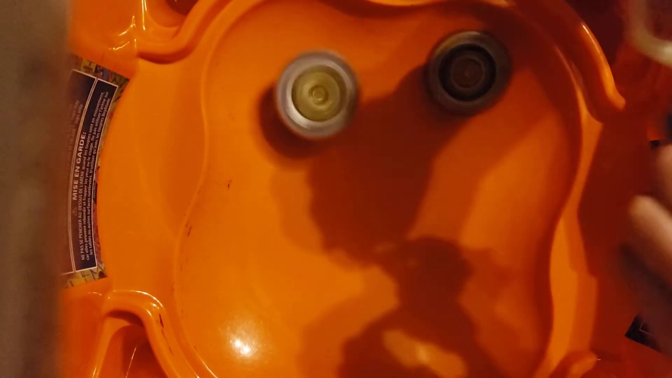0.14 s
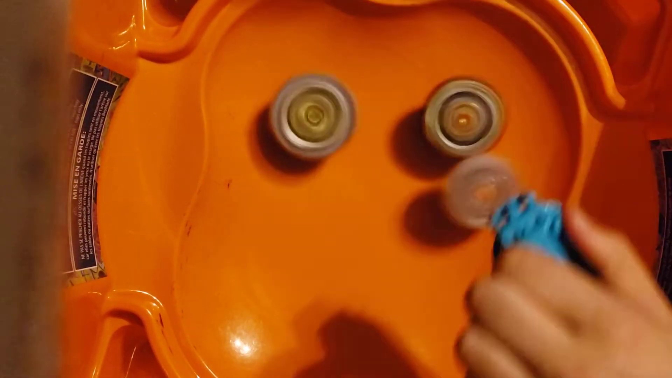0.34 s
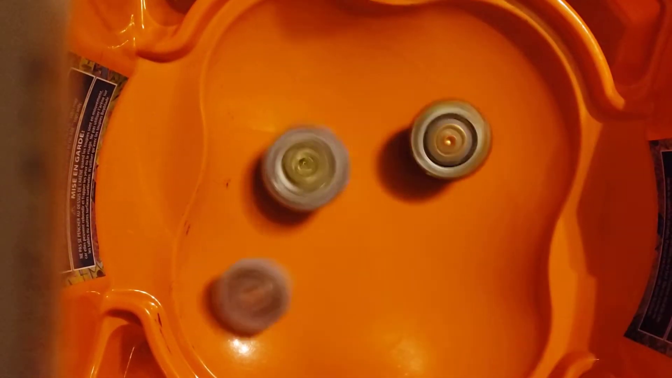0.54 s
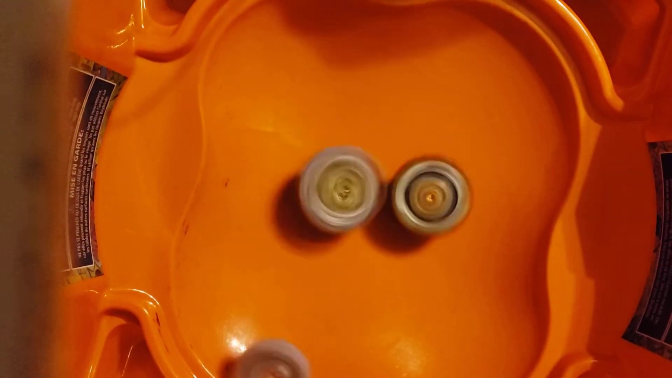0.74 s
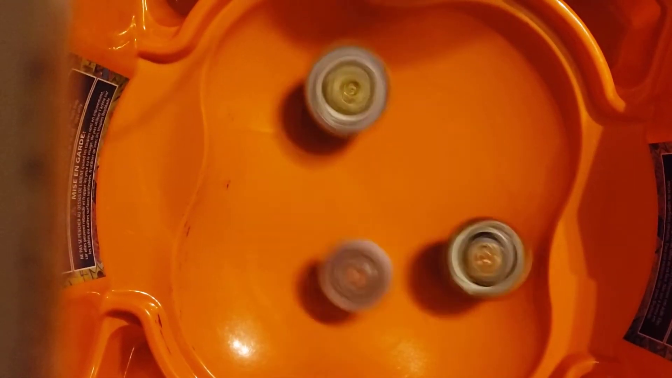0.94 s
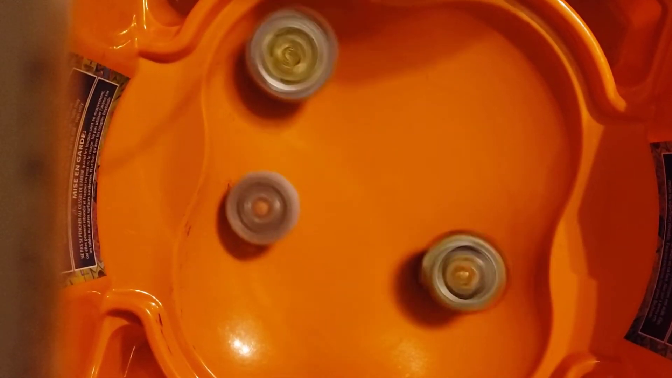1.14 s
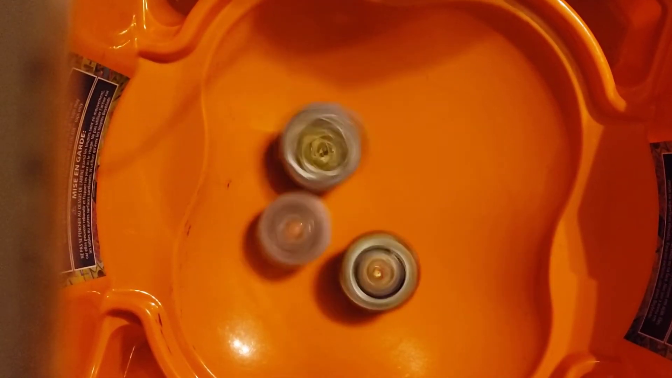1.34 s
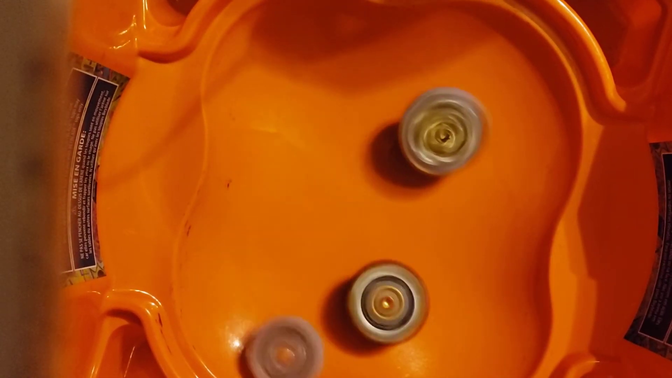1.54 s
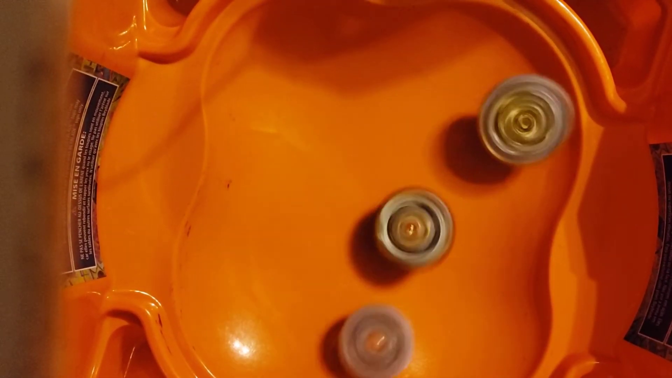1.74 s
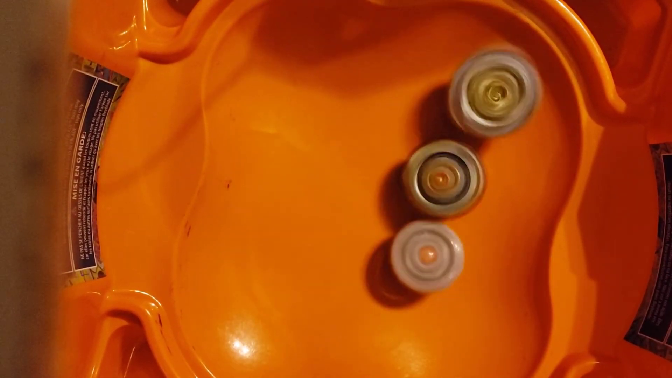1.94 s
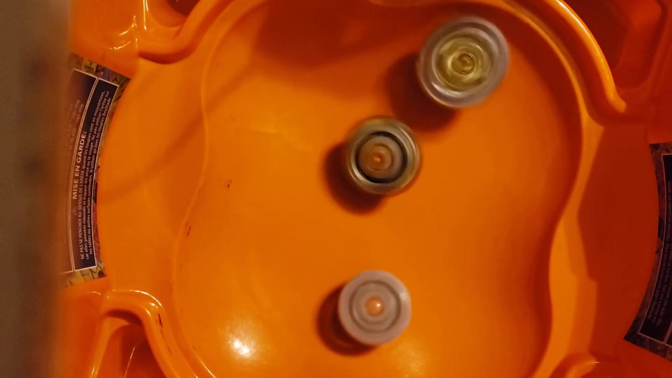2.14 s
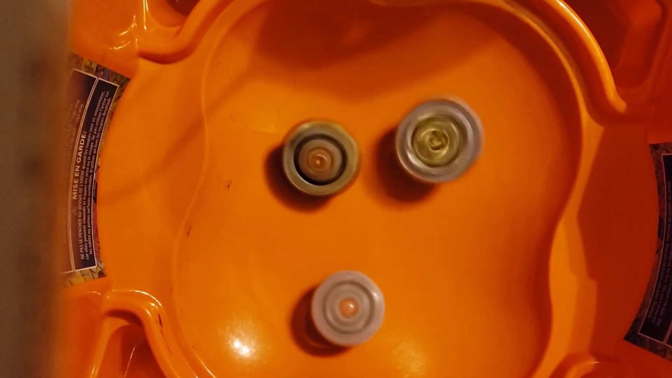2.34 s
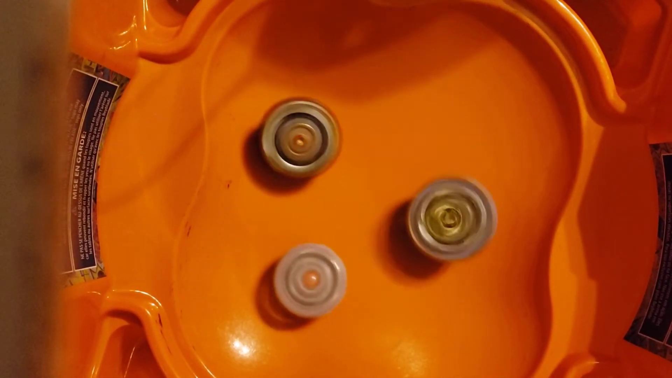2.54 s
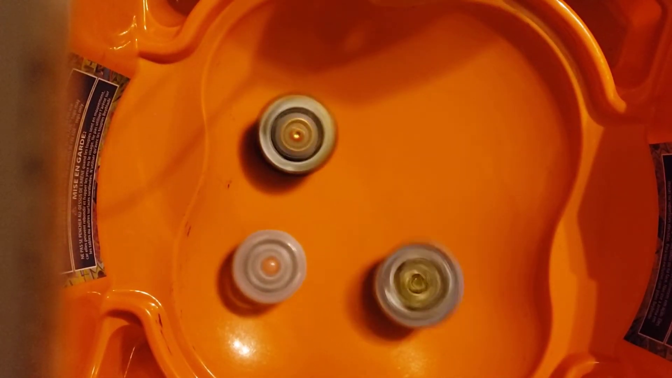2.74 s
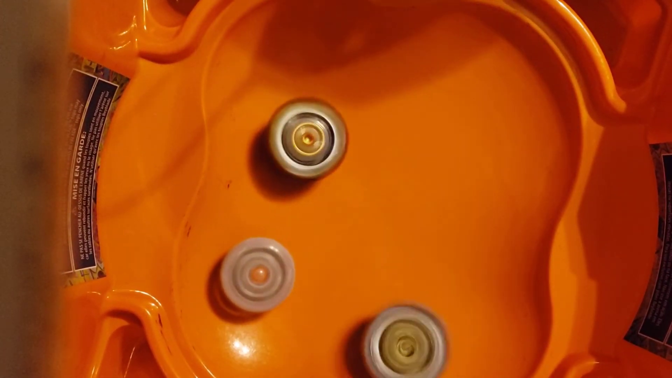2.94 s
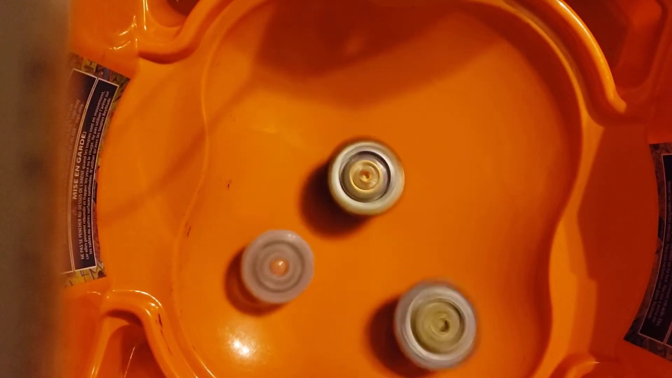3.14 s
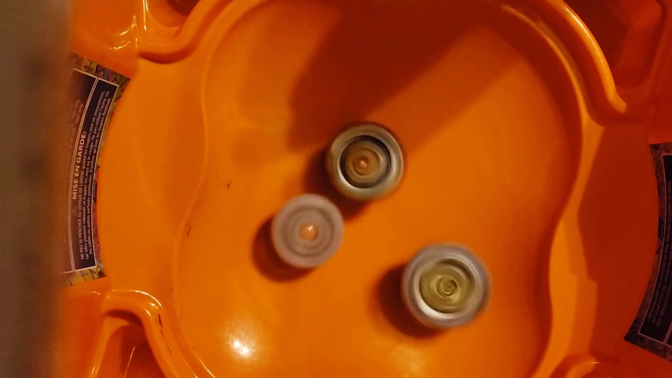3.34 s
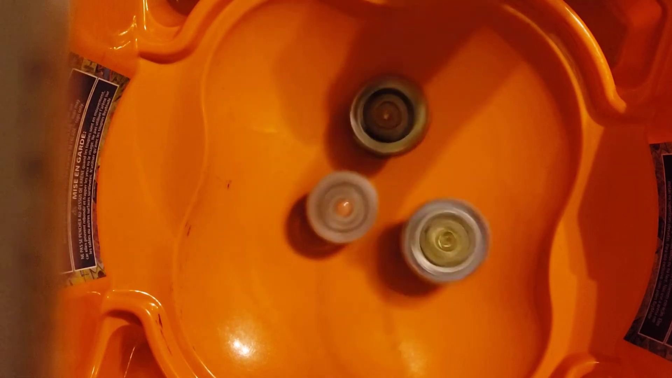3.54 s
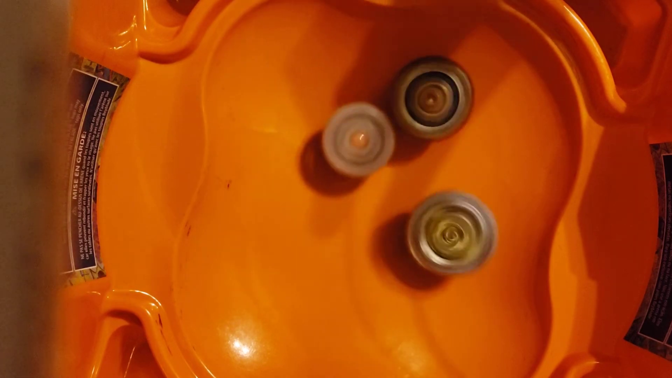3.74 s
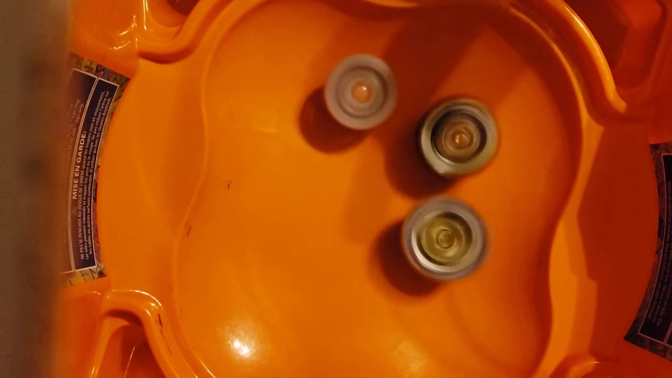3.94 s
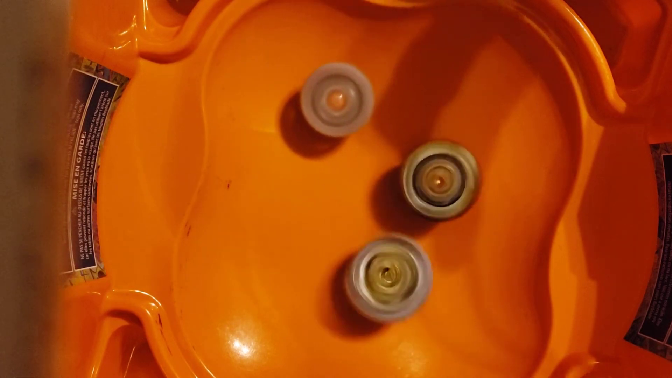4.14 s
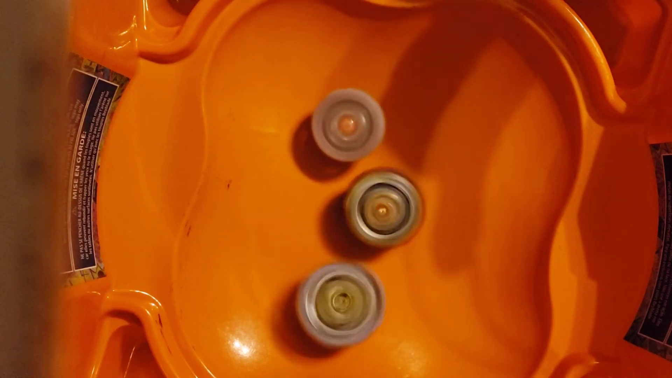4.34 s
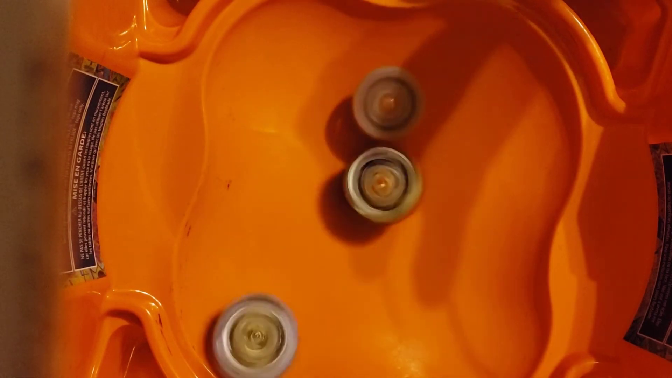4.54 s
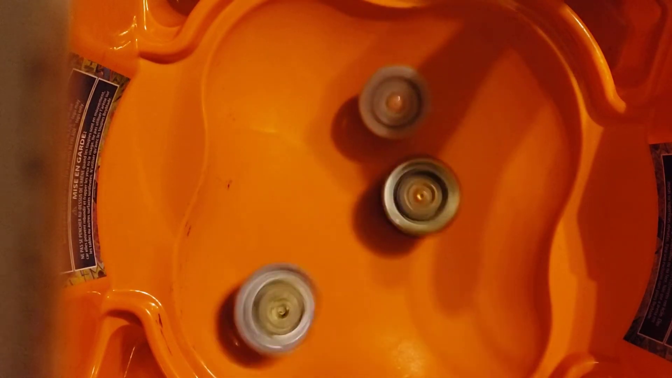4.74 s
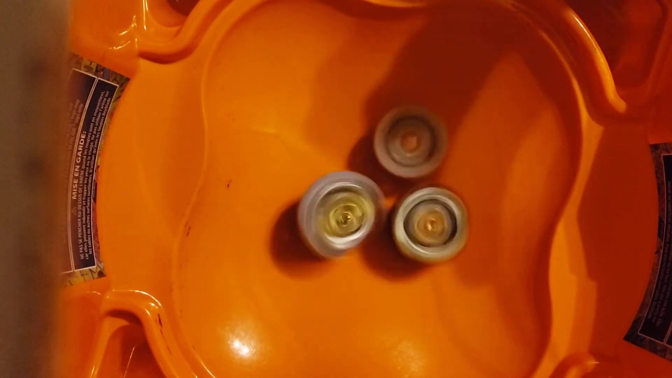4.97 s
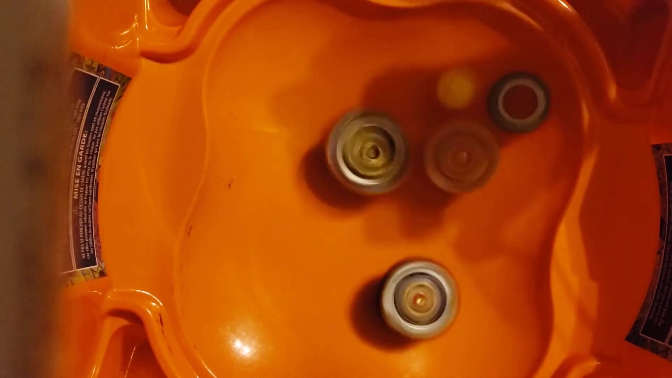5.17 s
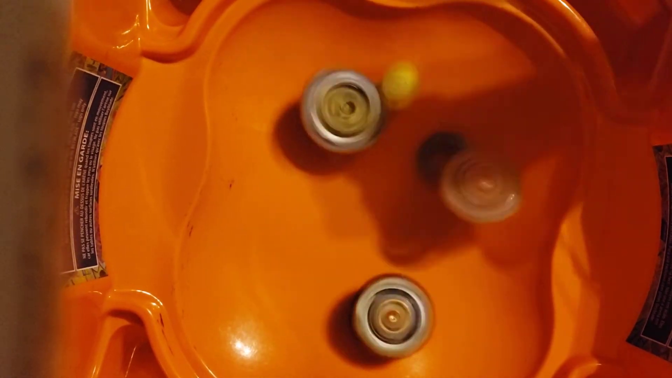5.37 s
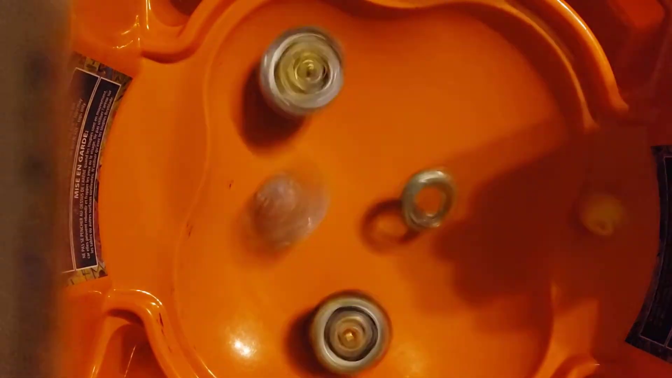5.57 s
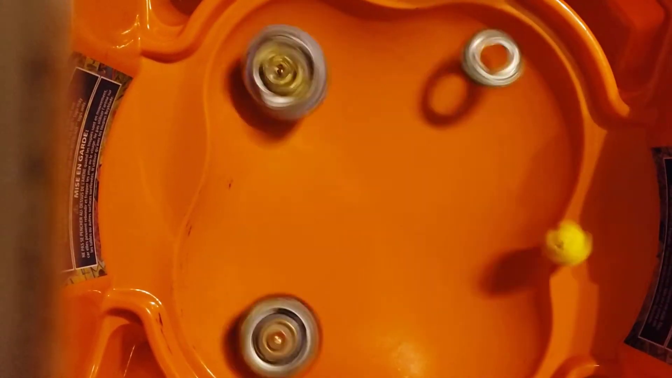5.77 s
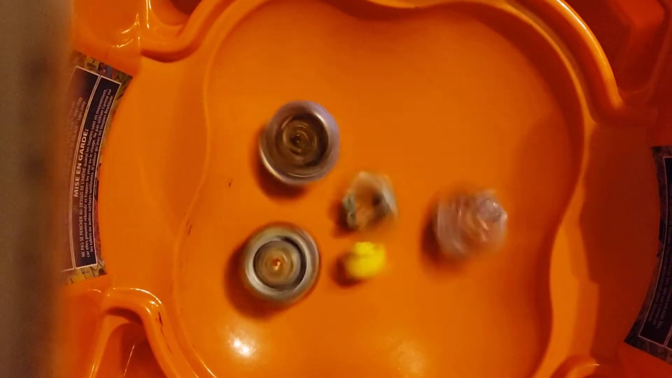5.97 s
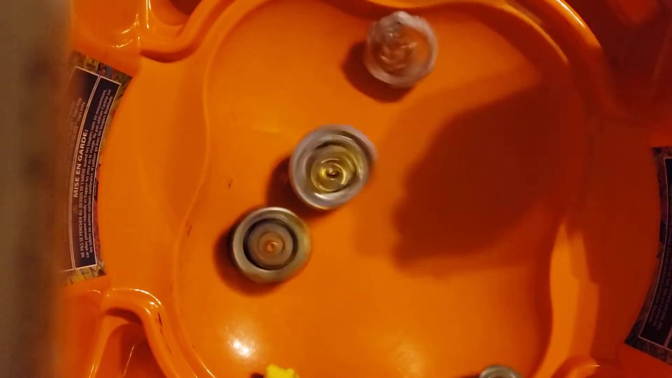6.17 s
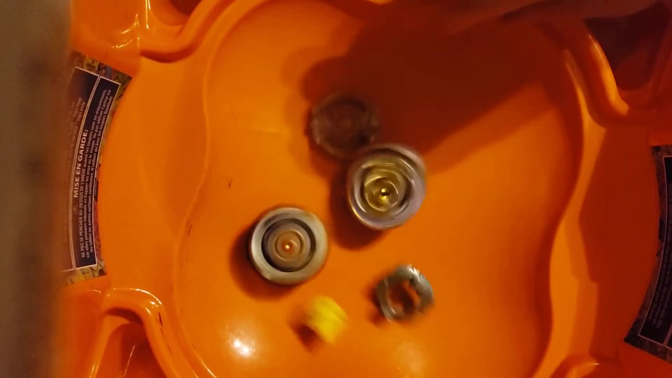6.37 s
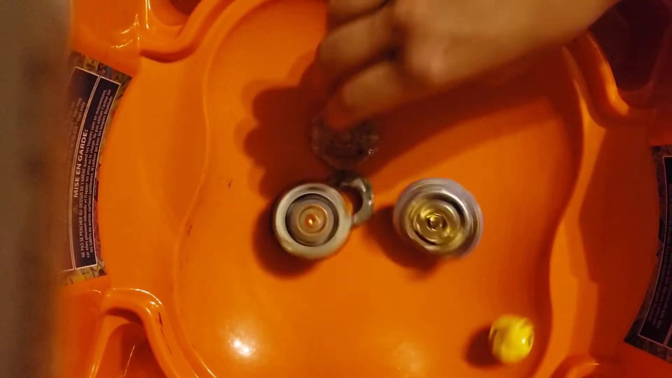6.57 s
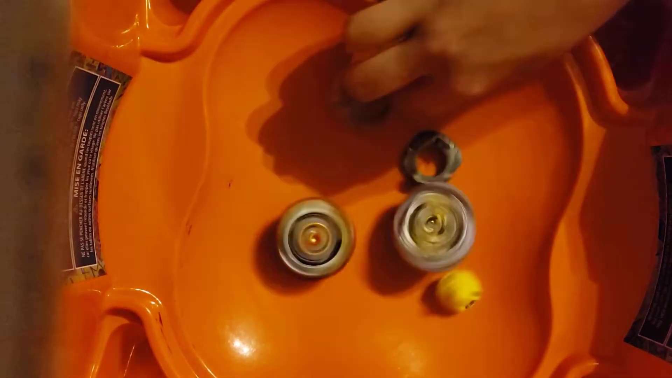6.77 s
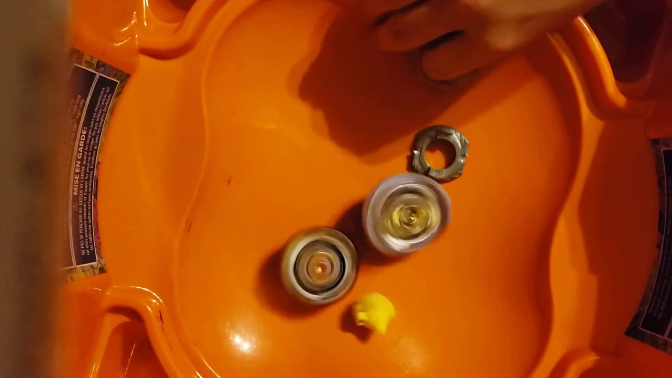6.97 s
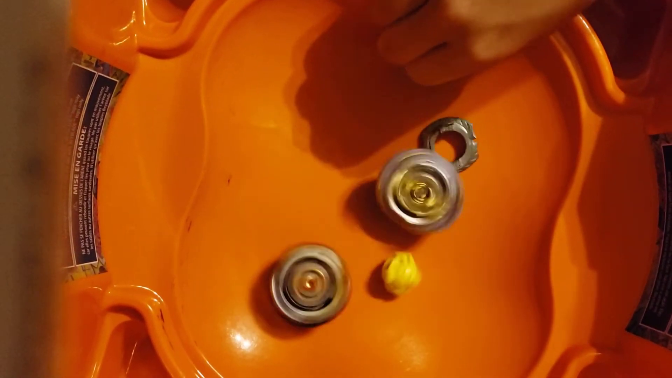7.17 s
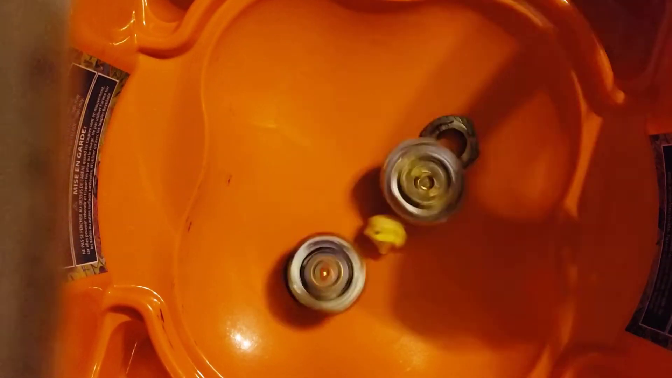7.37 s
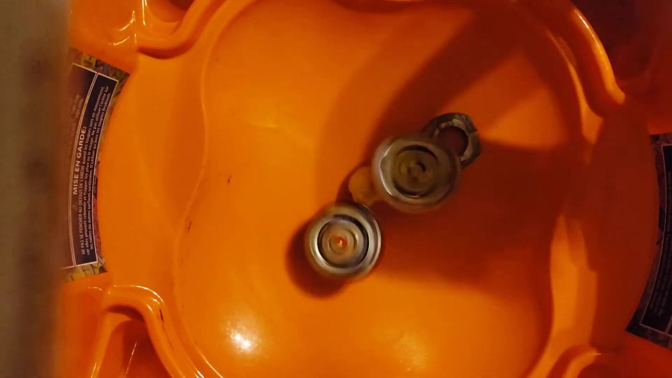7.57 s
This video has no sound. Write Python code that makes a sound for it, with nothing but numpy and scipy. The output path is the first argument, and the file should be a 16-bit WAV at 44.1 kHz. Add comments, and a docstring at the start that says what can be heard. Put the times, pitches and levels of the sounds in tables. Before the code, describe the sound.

Very close in a small room, tops spin on a thin hollow plastic shell with a low throbbing rumble, buzz and fast ticking. Faint taps open; at about 0.24 s a cord's teeth zip in a tenth-second rising rasp with a sharp crack. From 0.4 to 1.1 s bright rim clacks mix with dull shell thumps. More clicks come at 1.4, then a thump near 1.7 and a cluster around 2.0. Mostly whirring and faint skipping taps follow until hard clashes at 3.3-3.8, 4.05 and 4.45-4.6. Around 5.0 hits crowd together; at 5.2 a loud, heavy thud bursts one top. Parts bang, tumble and click densely until about 6.3, with a loose metal wheel ringing brightly at 5.55, 6.0 and 6.66. The clatter thins to small clicks over the continuing rumble, ending at about 7.5. The sound is brighter on the right.

```python
"""Spinning tops in a plastic arena

Three spinning tops fight in a thin plastic arena, close under a phone in a small room.
Clashing rims and thumps on the shell are short noise bursts with decaying modes; clashes unsettle the tops.
A rip cord launches the third top as a train of tooth cracks; the tips rumble and tick as shaped noise and pulses.
One top bursts: its parts tumble and click, and its loose metal wheel rings whenever it is struck."""
import sys
import numpy as np
from scipy import signal
from scipy.fft import rfft, irfft
from scipy.io import wavfile
from scipy.ndimage import uniform_filter1d

SR = 44100
rng = np.random.default_rng(int(sys.argv[2]) if len(sys.argv) > 2 else 0)


def master_out(mix):
    """Clip the mix to full scale and print it as 16-bit PCM to the path in sys.argv[1]."""
    frames = np.transpose(np.atleast_2d(mix))
    ceiling = np.clip(frames, -1, 1)
    pcm = np.round(ceiling * 32767).astype(np.int16)
    wavfile.write(sys.argv[1], SR, pcm)


N = 335601
TIME = np.arange(N) / SR
AGE = TIME[:SR * 3 // 4]  # time since a blow, in seconds

# one top bursts; its parts spread over the shell and slowly come to rest
BURST_S, SPREAD_S, PARTS_DB, REST_DB_PER_S = 5.19, 0.23, -23, 10.5
LIGHT_SCATTER_DB = 1  # light hits vary by at most this much either way

# Hard parts, mostly rims, strike each other. Each row: start in seconds, treble level of the crack in dB,
# plastic body in dB before weighting, metal ring in dB relative to the crack's level.
CLASHES = [(0.048, -44, -4, -15), (0.096, -40.5, -10, -20), (0.236, -16, -39, -4.5),
           (0.397, -20, -13.5, -19), (0.528, -15.5, -28, -16.5), (0.632, -37, 0.5, -14),
           (0.715, -19.5, -20, -1), (0.731, -33, -6, -18), (0.793, -21.5, -14, -25), (0.955, -18, -19, -29),
           (0.962, -26, -13, -13), (1.364, -21.5, -14.5, -20), (1.387, -19.5, -19, -8.5),
           (1.671, -27.5, 8, -14), (1.749, -41, 5, -16), (1.961, -27.5, -19, -17), (1.974, -21.5, -17, -14),
           (1.993, -21.5, -11, -11), (2.093, -30, -2, -16), (2.162, -44.5, -9, -22),
           (3.286, -16, -13.5, -4), (3.443, -20.5, -2.5, -17), (3.659, -15, -16, -12), (3.683, -23, 7, -6),
           (3.831, -40.5, 7, -30), (4.043, -16, -27.5, -14), (4.439, -30.5, -24, -4), (4.45, -15, -16, -7),
           (4.472, -16.5, -19, -4), (4.49, -21, -17, 4), (4.592, -19.5, -4, -28), (5.005, -22, 1, -22),
           (5.017, -19.5, -6, -5), (5.079, -18, -4.5, -9), (5.142, -21, -11, -6), (5.155, -17, -7, -1.5),
           (5.245, -23.5, -8, -13), (5.288, -42, 4, -16), (5.307, -16.5, -24, -6), (5.342, -24.5, 2, -13),
           (5.43, -23, -13, -5), (5.476, -24, -4, -13), (5.553, -22, -19, -15), (5.571, -16, -19, -6),
           (5.59, -18, -18, -13), (5.863, -32, -14, -18), (5.994, -17.5, -7, -1), (6.039, -18.5, 1, -7),
           (6.15, -21, -17, -12), (6.234, -46, -40, -13), (6.375, -31, -11, -17), (6.394, -33.5, -3, -20),
           (6.66, -25, -11, 2), (6.735, -24.5, -7, -17), (6.936, -29, 1, -16), (6.956, -20, -21, -6),
           (7.055, -34.5, -3, -20), (7.141, -23.5, -21, -5.5), (7.339, -40, 8, -23), (7.373, -32, -7, -23),
           (7.416, -34.5, 16, -22), (7.456, -31.5, 19.5, -20)]
# Modes of a metal rim. Each row: frequency in Hz, level in dB, 60 dB decay time in seconds.
RIM_MODES = [(2030, -9, .14), (3548, -10, .1), (4635, -5, .18), (5250, -4, .13), (5992, -2, .2),
             (6718, -3, .18), (7350, -2, .12), (8979, -7, .12), (9700, -2, .14), (10420, -6, .16),
             (11150, -1, .2), (11730, -3, .13), (12160, -1, .23), (12680, -5, .16), (14320, -4, .14),
             (14540, -2, .22)]
# Spectrum of a crack. Each row: frequency in Hz, gain in dB.
CLASH_COLOUR = [(100, -9), (500, 0), (1100, -5), (2000, 0.5), (2900, -6), (4800, 2), (7400, 4), (8700, -4),
                (12000, 1.5), (16000, 2)]
CLICK_PER_S, CLICK_DB = 7.6, 5  # loose parts click on each other, dB above their rumble
CLICK_BODY_DB, CLICK_RING_DB = 5, -13  # the clicks' body and ring, as in the table of clashes
RETOUCH_S, RETOUCH_DB = 0.011, -13.5  # about one turn after a clash the rims touch again
RATTLE_T60_S = 0.17


def clashes(crack_t60=0.018, rattle_db=-30, body_weight=0.38, top_db=-0.85):
    """Impact excitation: a hard crack, a second touch and a buzz of stacked parts, with the rim's modal ring."""
    out, rim = np.zeros(N), modes(RIM_MODES)
    clicks = [(s, parts_db(s) + CLICK_DB + db, CLICK_BODY_DB, CLICK_RING_DB)
              for s, db in light_hits(BURST_S + SPREAD_S, CLICK_PER_S)]
    touch = fade(crack_t60) * (1 - fade(0.011))
    again = np.interp(AGE - RETOUCH_S, AGE, touch)
    rattle = amp(rattle_db) * fade(RATTLE_T60_S)
    contact = (touch + amp(RETOUCH_DB) * again + rattle)[:SR // 4]
    for s, db, body_db, ring_db in CLASHES + clicks:
        crack = rng.standard_normal(len(contact)) * contact
        body_gain_db = body_weight * (body_db + 15)
        crack = colour(crack, [(2500, body_gain_db), (5000, 0.02), (8000, 0.015), (13000, top_db)])
        crack = colour(crack, CLASH_COLOUR)
        metal = whirl(ring(rim, scatter_db=4), turn_hz=65, depth=0.9, shift_hz=45)
        add(out, s, amp(db) * crack / attack_level(band(crack, 6750, "high")))
        add(out, s, amp(db + ring_db) * metal)
    return out


# Heavy blows on the arena shell. Each row: start in seconds, level in dB, hardness in dB before weighting.
KNOCKS = [(0.329, -25, -3.5), (0.399, -31, -25), (0.413, -35, -22), (0.557, -31.5, -7),
          (0.631, -15.5, -1.5), (0.68, -18, -7.5), (0.747, -18, -4.5), (0.76, -21.5, 0.5),
          (0.771, -23.5, 0), (0.829, -12.5, -9), (0.846, -18.5, 3), (0.9, -15, -14.5), (1.019, -30, -2.5),
          (1.034, -21, -9.5), (1.115, -25.5, 2), (1.684, -16.5, -6.5), (4.458, -34, -22), (4.537, -29, -2),
          (5.021, -32.5, -10), (5.137, -22.5, -15), (5.193, -6, -20), (5.245, -12, -13.5),
          (5.286, -13.5, -11), (5.322, -9.5, -27), (5.328, -10.5, -21), (5.345, -11.5, -26),
          (5.35, -14.5, -8), (5.412, -23, -3), (5.434, -17.5, -21.5), (5.556, -16.5, -15),
          (5.591, -18, -28), (5.66, -11.5, -16), (5.695, -10, -26), (5.739, -15.5, -13.5),
          (5.778, -12, -27), (5.851, -19.5, -7), (5.864, -11.5, -12), (5.942, -18.5, -12),
          (5.981, -15.5, -13.5), (6.112, -18, -16.5), (6.134, -19.5, -7), (6.152, -20.5, -11),
          (6.236, -20, -6), (6.275, -23, -17), (6.315, -21.5, -34), (6.522, -25, -15.5), (6.605, -26, -2.5),
          (6.973, -29.5, -10), (7.372, -30, -5)]
# Modes of the plastic shell. Each row: frequency in Hz, level in dB, 60 dB decay time in seconds.
SHELL_MODES = [(178, -8, .25), (200, -10, .2), (350, -8, .12), (437, 2, .16), (480, -2, .1), (581, 0, .15),
               (807, -6, .07), (1055, -7, .07), (1590, -11, .05), (2035, -10, .05)]
# Spectrum of a blow on the shell. Each row: frequency in Hz, gain in dB.
KNOCK_COLOUR = [(40, -32), (120, -15), (190, 2), (290, -9.5), (440, 3.5), (600, 2.5), (850, -3.5),
                (1300, -9.5), (2050, -5), (3000, -14.5), (5000, -17.5), (9000, -29.5), (16000, -25.5)]
SHELL_DB = -8  # shell modes relative to the blow
USUAL_HARD_DB = -11  # hardness of an average blow
TUMBLE_PER_S, TUMBLE_DB, TUMBLE_HARD_DB = 19, 3.5, -10.5  # light knocks of the parts, dB above their rumble
# low boom of a full-scale blow; dB more for each dB lighter, and for each dB softer; upper limit
BOOM_DB, BOOM_SLOPE, BOOM_PER_SOFT, BOOM_MOST_DB = -16, 0.59, 0.3, 5.5


def knocks(flex_db=-19, flex_per_hard=0.16, flex_t60=0.057, hard_weight=0.86, mid_weight=0.64):
    """Bending waves: a sharp thump stirs waves that settle into shell modes; hard blows stir more of them."""
    out, shell = np.zeros(N), modes(SHELL_MODES)
    tumbles = [(s, parts_db(s) + TUMBLE_DB + db, TUMBLE_HARD_DB)
               for s, db in light_hits(BURST_S + SPREAD_S, TUMBLE_PER_S)]
    flex = fade(flex_t60)[:SR // 4]
    for s, db, hard_db in KNOCKS + tumbles:
        boom_db = min(BOOM_DB - BOOM_SLOPE * db - BOOM_PER_SOFT * hard_db, BOOM_MOST_DB)
        harder_db = hard_db - USUAL_HARD_DB
        blow = amp(flex_db + flex_per_hard * harder_db) * rng.standard_normal(len(flex)) * flex
        blow[0] -= 1  # the thump itself
        hardness = [(1100, mid_weight * harder_db), (2000, hard_weight * hard_db)]
        blow = colour(blow, [(180, boom_db), (400, 0), (600, 0.0044)] + hardness)
        blow = colour(blow, KNOCK_COLOUR)
        settle = ring(shell, scatter_db=2.5).imag * (1 - fade(0.012))
        add(out, s, amp(db) * blow / attack_level(band(blow, 1360, "low"), size=350))
        add(out, s, amp(db + SHELL_DB) * settle)
    return out


# Blows on the loose wheel. Each row: start in seconds, level in dB, frequency in Hz that the blow favours.
WHEEL_HITS = [(5.555, -11, 6700), (5.572, -10.5, 9200), (5.994, -19, 15500), (6.151, -27, 6500),
              (6.660, -15, 11000), (6.736, -28, 9500)]
# Modes of the wheel. Each row: frequency in Hz, level in dB, 60 dB decay time in seconds.
WHEEL_MODES = [(5582, -3, .7), (5712, -4, .95), (5787, -7, .7), (7100, -11, .45), (7340, -8, .3),
               (7763, 3, .2), (8850, -2, .62), (8930, -6, .55), (11580, 1, .36), (15320, 0, .42),
               (15650, -1, .28)]


def loose_wheel():
    """Selective modal excitation: the freed wheel rings long, its modes far from the favoured pitch weaker."""
    out = np.zeros(N)
    for s, db, favoured_hz in WHEEL_HITS:
        struck = []
        for hz, mode_db, t60 in WHEEL_MODES:
            octaves = np.log2(hz / favoured_hz)
            struck.append((hz, mode_db - min(24 * octaves ** 2, 18), t60))
        tone = ring(modes(struck), scatter_db=1)
        add(out, s, amp(db) * whirl(tone, turn_hz=32, depth=0.9, shift_hz=8))
    return out


# Spectrum of the toothed cord. Each row: frequency in Hz, gain in dB.
RIP_COLOUR = [(200, -27.5), (1200, -18), (2300, -5.5), (4000, -0.5), (7500, 3.5), (9000, -6), (13000, 5),
              (16000, -1.5)]
PULL_S, PULL_LENGTH_S, PULL_DB, PULL_RELEASE_DB_PER_S = 0.24, 0.11, -18, 1000
SLACK_S, SLACK_DB = 0.1, -19  # the slack is taken up before the pull, dB relative to it
SLOW_TEETH_HZ, FAST_TEETH_HZ, SPEED_UP_S = 260, 1317, 0.11  # mean tooth rates


def launcher():
    """Pulse-train excitation: the toothed cord races through the launcher's gear, every tooth a tiny crack."""
    age = TIME - PULL_S
    teeth_hz = np.interp(age, [0, SPEED_UP_S], [SLOW_TEETH_HZ, FAST_TEETH_HZ])
    slack = amp(SLACK_DB) * np.clip(1 + age / SLACK_S, 0, 1) ** 2
    pull = amp(-PULL_RELEASE_DB_PER_S * np.maximum(age - PULL_LENGTH_S, 0))
    teeth = pulses(teeth_hz * (1 + 0.025 * walk(300)), scatter_db=1.5)
    grit = signal.fftconvolve(teeth, fade(0.006))[:N] * rng.standard_normal(N)
    rip = unit(colour(unit(teeth) + 2 * unit(grit), RIP_COLOUR))
    return amp(PULL_DB) * np.where(age < 0, slack, pull) * rip


# The tops run down steadily. Each row: turns per second at the start, turns per second lost each second.
SPINS = [(86.5, 5.3), (63, 3.5)]
# The tips scrub harder as the tops race up the bowl, softer in its middle.
# Each row: time in seconds, level in dB before the mix.
SCRUB = [(.2, -54), (.55, -50), (1.28, -59), (1.55, -54), (1.87, -52), (2.25, -51), (3.05, -59),
         (3.5, -54.5), (4.35, -50.5), (7.6, -50)]
# A top leans and wobbles. Each row: start in seconds, length in seconds, mean throb rate in Hz,
# level in dB before the mix.
WOBBLES = [(-.04, 0.08, 82.4, -39), (0.396, 0.11, 90, -47.5), (3.66, 0.342, 67, -45),
           (4.454, 0.2, 89.4, -41.5), (4.84, 0.257, 91, -39)]
# Spectrum of the rumble on the shell. Each row: frequency in Hz, gain in dB.
ROLL_COLOUR = [(25, -22), (60, -5), (120, -10), (175, 2.5), (280, -1), (440, 0), (600, 0.5), (850, -11.5),
               (1400, -18.5), (2000, -21), (3000, -28), (16000, -54.5)]
# Spectrum of the ticking tips. Each row: frequency in Hz, gain in dB.
TICK_COLOUR = [(200, -9.5), (1400, -4), (2050, 3.5), (2700, -7.5), (3400, 0.5), (4600, -1), (7400, -3.5),
               (9000, -11.5), (12500, -11), (16000, -17)]
DRUM_HZ, DRUM_WIDTH_HZ, DRUM_DB = 92.5, 15, -11.5  # the shell's lowest resonance, woken by all scrubbing
PARTS_LOW_HZ = 110  # the light parts hardly move the shell below this


def tips(rumble_db=-2, chatter_db=-10, wobble_chatter_db=-9, parts_chatter_db=-14,
         hum_db=-4, wobble_hum_db=-1, rub_db=-8):
    """Friction and unbalance: tips and parts scrub the shell, tips tick once a turn, wobbling tops throb."""
    spins_hz = [np.maximum(hz - loss * TIME, 10) for hz, loss in SPINS]
    steps = TIME[::256]
    steady_scrub = amp(np.interp(TIME, *np.transpose(SCRUB)))
    scrub = np.hypot(steady_scrub, np.interp(TIME, steps, unsettled(steps)))
    wobbles = [(hz, amp(db) * wobble(s, length)) for s, length, hz, db in WOBBLES]
    lean = sum(level for _, level in wobbles)
    parts = amp(parts_db(TIME)) * np.clip((TIME - BURST_S) / SPREAD_S, 0, 1)

    turns = sum(pulses(hz * (1 + 0.054 * walk(25)), scatter_db=3.5) for hz in spins_hz)
    roughness = rng.standard_normal(N) * amp(4.96 * walk(18))
    bumps = unit(band(turns, 92, "high")) + 0.74 * roughness
    drum_edges_hz = [DRUM_HZ - DRUM_WIDTH_HZ / 2, DRUM_HZ + DRUM_WIDTH_HZ / 2]
    drum = band(bumps, drum_edges_hz, "band", order=1)
    rumble = unit(colour(bumps, ROLL_COLOUR)) + amp(DRUM_DB) * unit(drum)
    light_rumble = band(rumble, PARTS_LOW_HZ, "high", order=1)
    rumbling = amp(rumble_db) * (np.hypot(scrub, lean) * rumble + parts * light_rumble)

    ticks = unit(signal.fftconvolve(turns, fade(0.016))[:N]) + amp(rub_db)  # with a steady rub between
    chatter = unit(colour(ticks * rng.standard_normal(N), TICK_COLOUR))
    chatter_parts = [amp(chatter_db) * scrub, amp(wobble_chatter_db) * lean, amp(parts_chatter_db) * parts]
    chatter_level = np.linalg.norm(chatter_parts, axis=0)  # independent sources add in power

    hum = amp(hum_db) * scrub * throb(spins_hz[0])
    wobble_hum = amp(wobble_hum_db) * sum(level * throb(hz) for hz, level in wobbles)
    return rumbling + chatter_level * chatter + hum + wobble_hum


UNSETTLE_DB, SETTLE_DB_PER_S = -32.5, 27.5  # extra scrub relative to the clash, and its decay


def unsettled(s):
    """Power summation: extra scrub at the times s, left by earlier clashes until the tops right themselves."""
    times, db = np.transpose(CLASHES)[:2]
    age = s[:, None] - times
    left = amp(db + UNSETTLE_DB - SETTLE_DB_PER_S * np.abs(age)) * (age >= 0)
    return np.linalg.norm(left, axis=1)


WOBBLE_ATTACK_S, WOBBLE_RELEASE_S = 0.04, 0.045


def wobble(s, length):
    """Amplitude envelope: a wobble sets in, holds and dies away exponentially."""
    onset = np.clip((TIME - s) / WOBBLE_ATTACK_S, 0, 1)
    return onset * np.exp(-np.maximum(TIME - s - length, 0) / WOBBLE_RELEASE_S)


UNBALANCE_HZ = 83.3  # the throb has full strength at this rate


def throb(hz):
    """Rotating unbalance: the shell is rocked with a force that grows as the rate squared, a little unsteadily."""
    phase = 2 * np.pi * np.cumsum(hz * (1 + 0.07 * walk(35))) / SR
    rocking = np.sin(phase) + 0.25 * np.sin(2 * phase)
    return (hz / UNBALANCE_HZ) ** 2 * unit(rocking * (1 + 0.8 * walk(22)))


def parts_db(s):
    """Energy loss: the loose parts' rumble level falls linearly in dB from the burst on."""
    return PARTS_DB - REST_DB_PER_S * np.maximum(s - BURST_S, 0)


def light_hits(start, per_s, count=48):
    """Jittered point process: small contacts from start on, as (s, dB off the usual strength)."""
    place, size = rng.random((count, 2)).T
    times = start + (np.arange(count) + place) / per_s
    return [(s, db) for s, db in zip(times, LIGHT_SCATTER_DB * (2 * size - 1)) if s < TIME[-1]]


GRAZE_PER_S, GRAZE_DB = 9, 2.5  # unsettled tops barely touch each other, dB above their extra scrub


def grazes(graze_t60=0.05):
    """Amplitude-modulated noise: faint bright ticks that die out as the tops right themselves."""
    out = np.zeros(N)
    times, dbs = np.transpose(light_hits(0, GRAZE_PER_S, count=96))
    for s, level in zip(times, unsettled(times) * amp(GRAZE_DB + dbs)):
        add(out, s, level * fade(graze_t60))
    return out * unit(colour(rng.standard_normal(N), CLASH_COLOUR))


# A tip skips over the shell. Each row: start in seconds, length in seconds, mean tap level in dB.
SKIPS = [(2.213, .17, -48.5), (2.855, .17, -54), (3.136, .11, -53.5), (4.818, 0.17, -40)]
# Spectrum of a tap. Each row: frequency in Hz, gain in dB.
SKIP_COLOUR = [(300, -16), (1500, -4.5), (2030, 4), (2600, -19), (3500, -15.5), (5000, -9.5), (7400, -9.5),
               (9000, -22), (16000, -15)]


def skips(skip_hz=33):
    """Repeated light impacts: short runs of taps wake the shell's nasal 2 kHz resonance."""
    out = np.zeros(N)
    for s, length, db in SKIPS:
        for start in np.arange(s, s + length, 1 / skip_hz):
            tap = colour(rng.standard_normal(len(AGE)) * fade(0.024), SKIP_COLOUR)
            level = amp(db + 2 * rng.standard_normal())
            add(out, start + 0.019 * rng.standard_normal(), level * tap / attack_level(tap))
    return out


def room(x, low_db=-11, high_db=-7, low_t60=0.26, high_t60=0.19):
    """Reverberation: echoes from the arena walls and the room, in which the lows linger longest."""
    build = 1 - fade(0.005)
    low, high = (echoes(x, build * fade(t60)) for t60 in (low_t60, high_t60))
    return amp(low_db) * band(low, 660, "low") + amp(high_db) * band(high, 636, "high")


def scattered(x):
    """Scattering: treble also reaches the shaded port by short detours off the arena walls."""
    detours = band(echoes(x, fade(0.012)), 900, "high", order=1)
    return colour(x + amp(1) * detours, [(500, 0), (2000, -3.5)])


def echoes(x, envelope, move_hz=9, count=4):
    """Time-varying diffuse field: dense echoes whose paths keep changing as the tops move about."""
    out = 0
    for _ in range(count):
        paths = rng.standard_normal(len(AGE)) * envelope
        change = np.cos(2 * np.pi * (move_hz * rng.random() * TIME + rng.random()))
        out = out + signal.fftconvolve(x * change, paths / np.linalg.norm(paths))[:N]
    return out * np.sqrt(2 / count)


def modes(table):
    """Modal superposition: one decaying complex partial per mode."""
    return np.array([amp(db) * fade(t60) * np.exp(2j * np.pi * hz * AGE) for hz, db, t60 in table])


def ring(partials, scatter_db):
    """Modal participation: each point of contact shares a blow differently; the result stays complex."""
    count = len(partials)
    share = unit(amp(scatter_db * rng.standard_normal(count)))
    start_phase = np.exp(2j * np.pi * rng.random(count))
    return (share * start_phase) @ partials / np.sqrt(count)


def whirl(tone, turn_hz, depth, shift_hz):
    """Phase modulation: a turning body swings and slightly shifts its ring, which splits each line."""
    turns = turn_hz * rng.uniform(0.7, 1.3) * AGE + rng.random()
    phase = depth * np.sin(2 * np.pi * turns) + 2 * np.pi * shift_hz * rng.standard_normal() * AGE
    return (tone * np.exp(1j * phase)).imag


def pulses(hz, scatter_db):
    """Periodic excitation: one pulse of random size per cycle, scaled for equal power at any rate."""
    wraps = np.diff(np.floor(np.cumsum(hz) / SR), prepend=0)
    size = amp(scatter_db * np.clip(rng.standard_normal(N), -2, 2))
    return wraps * size / np.sqrt(hz / SR)


def walk(rate):
    """Smoothed random process: a slow wander with rms 1."""
    k = int(SR / rate)
    held = np.repeat(rng.standard_normal(N // k + 1), k)
    return unit(uniform_filter1d(held, k)[:N])


def fade(t60):
    """Exponential decay: 60 dB down after t60 seconds."""
    return np.exp(-np.log(1000) * AGE / max(t60, 1e-3))


def colour(x, points, size=2048):
    """Minimum-phase filtering: a causal filter through (Hz, dB) points, from the cepstrum of its gain."""
    hz, db = np.transpose(points)
    bins = np.maximum(np.arange(size // 2 + 1) * SR / size, 1)
    cep = irfft(np.log(amp(np.interp(np.log(bins), np.log(hz), db))))
    cep[1:size // 2] *= 2  # fold the cepstrum onto positive time
    cep[size // 2 + 1:] = 0
    return signal.fftconvolve(x, irfft(np.exp(rfft(cep))))[:len(x)]


def band(x, edges_hz, kind, order=2):
    """Butterworth filtering: a maximally flat passband."""
    return signal.sosfilt(signal.butter(order, edges_hz, kind, fs=SR, output="sos"), x)


def amp(db):
    """Logarithmic level: decibels to gain."""
    return 10 ** (np.asarray(db) / 20)


def unit(x):
    """Power normalisation: scale to rms 1."""
    return x / np.sqrt(np.mean(x ** 2))


def attack_level(x, size=256):
    """Short-time level: rms of the first few milliseconds."""
    return np.sqrt(np.mean(x[:size] ** 2))


def add(out, s, x):
    """Superposition: mix x in at time s."""
    i = max(int(s * SR), 0)
    out[i:i + len(x)] += x[:max(N - i, 0)]


# Shadow of the phone's body on its left port. Each row: frequency in Hz, gain in dB.
SHADOW = [(60, -5.5), (180, -4.3), (350, -3.6), (700, -6), (1400, -9), (2800, -6.5), (5600, -8.5),
          (10000, -9.5), (14000, -13)]
PORT_LAG = 19  # samples


def scene():
    """Diffraction and delay: the right port faces the arena, the left is shaded and hears it a little later."""
    dry = clashes() + knocks() + loose_wheel() + grazes() + launcher() + tips() + skips()
    near, far = (x + room(x) for x in (dry, scattered(dry)))
    late = np.pad(far, (PORT_LAG, 0))[:N]
    return np.array([colour(late, SHADOW), near])


TOP_HZ = 15950


def record(dry):
    """Saturation and band limiting: the phone clips at full scale and cuts the top."""
    clipped = np.clip(dry, -1, 1)
    return signal.sosfilt(signal.ellip(10, 0.2, 70, TOP_HZ, fs=SR, output="sos"), clipped)


dry = scene()
out = record(dry)
master_out(out)
```